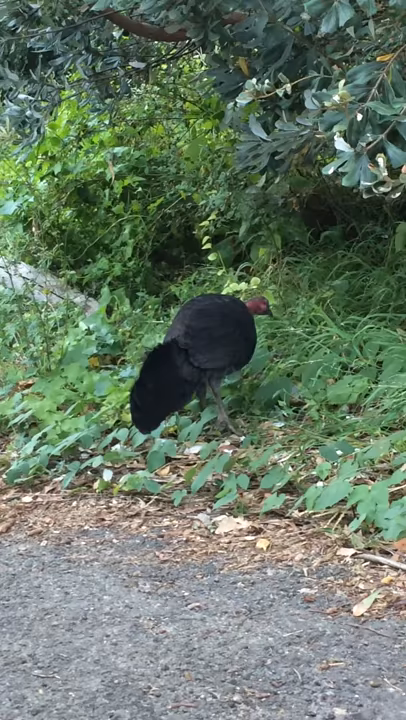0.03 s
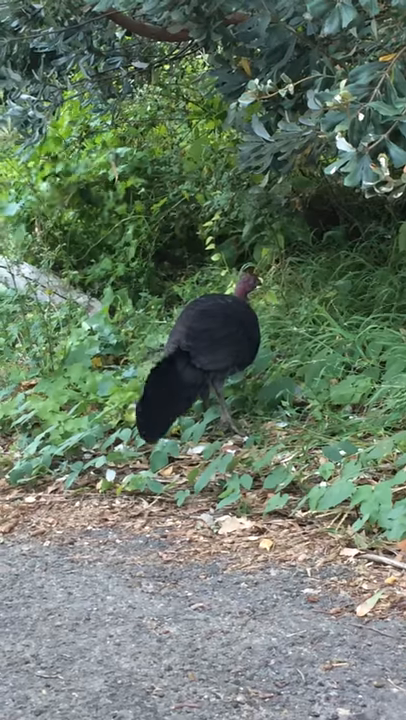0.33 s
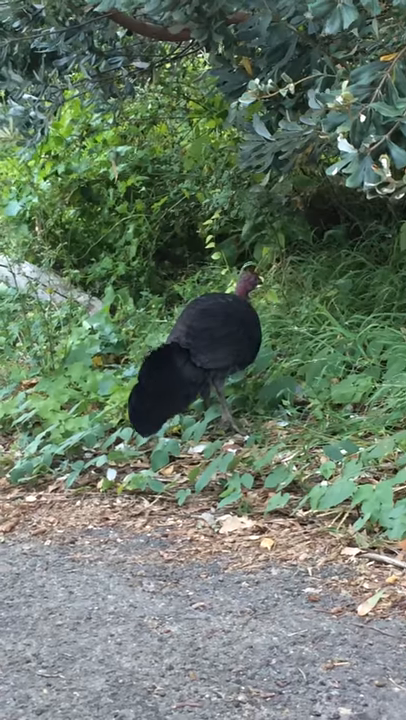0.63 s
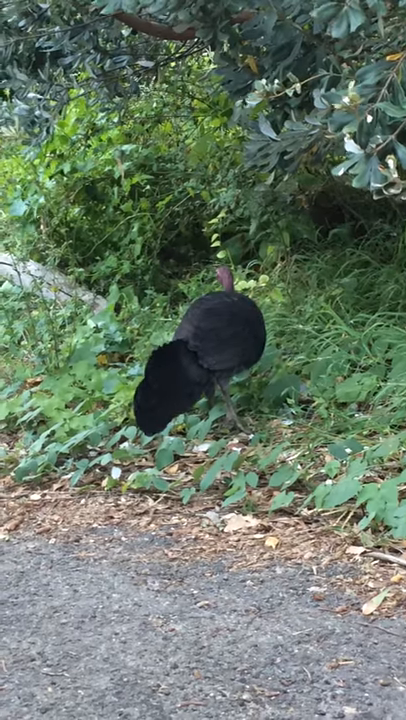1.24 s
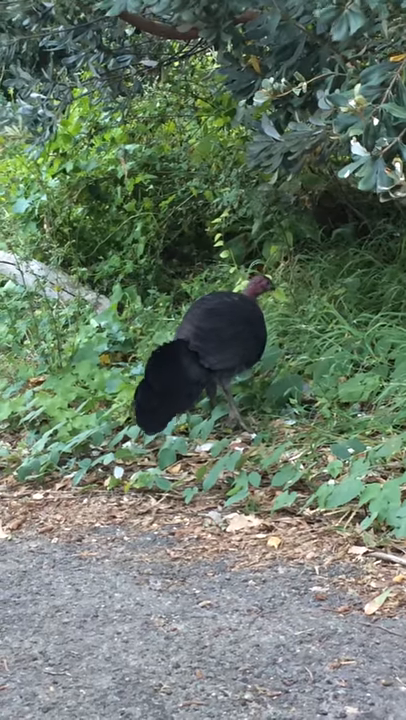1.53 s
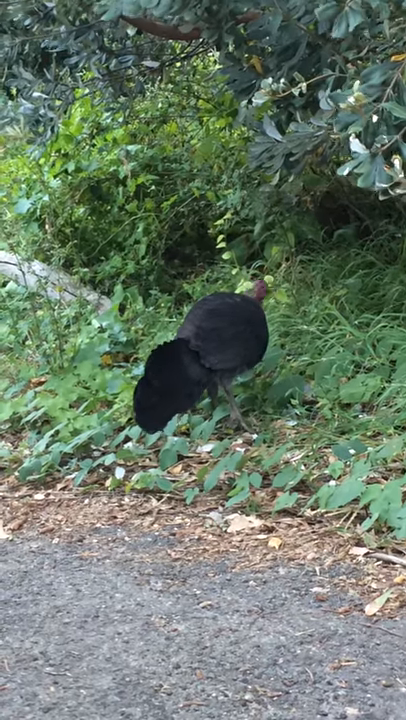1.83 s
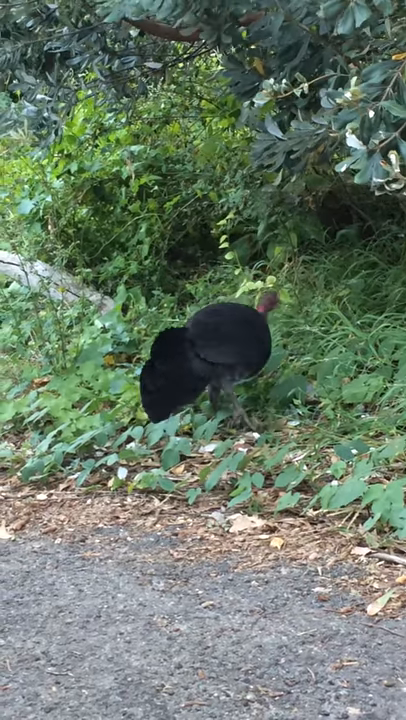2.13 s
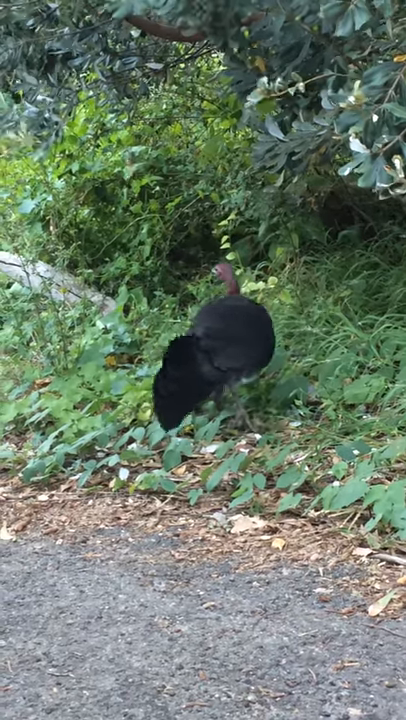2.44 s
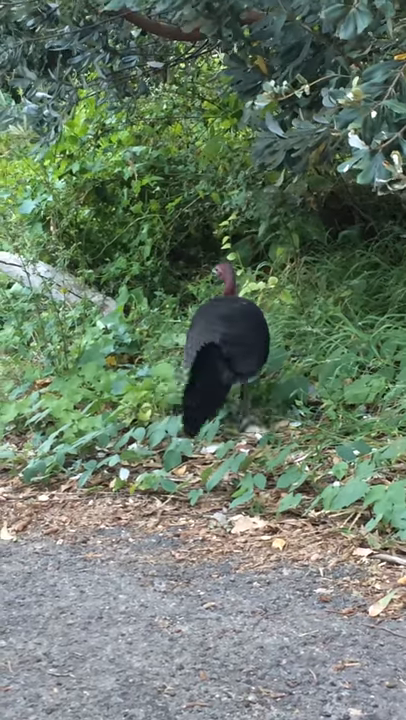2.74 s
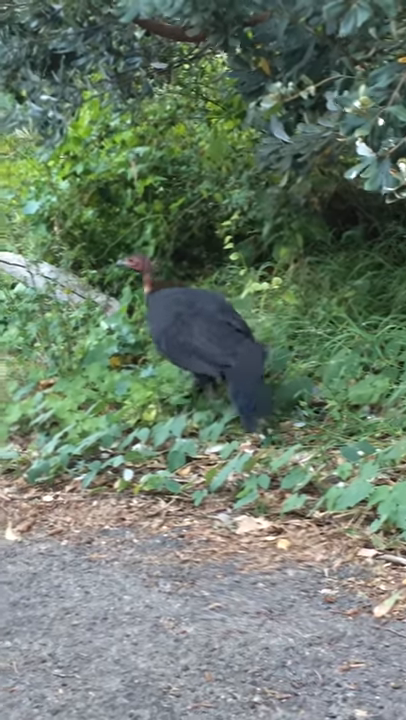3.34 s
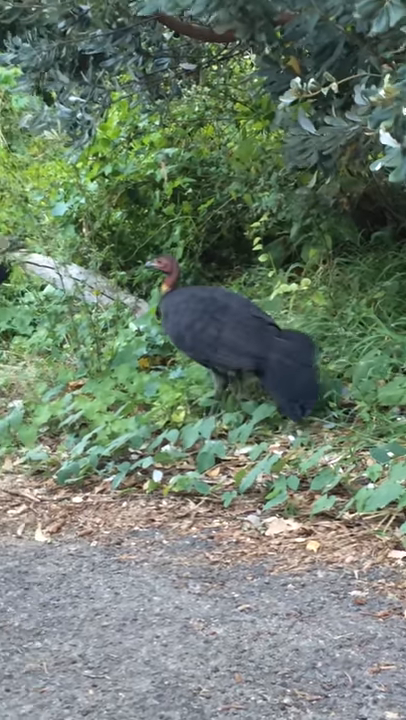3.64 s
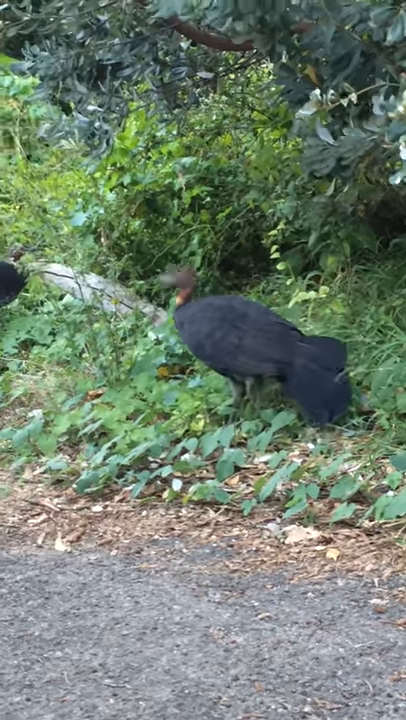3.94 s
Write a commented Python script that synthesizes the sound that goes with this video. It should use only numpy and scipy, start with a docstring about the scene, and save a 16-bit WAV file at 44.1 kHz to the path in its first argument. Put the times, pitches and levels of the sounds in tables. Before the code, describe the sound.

Soft rustles and tiny snaps of a bird stepping through leaves, with a low outdoor rumble.

```python
"""Ground bird in dry leaves

A large bird shifts its feet and turns round in low plants beside a suburban path. Feet and
feathers swish through the leaves; dry stalks snap and set the litter ringing. Behind it lie the
wash and drone of far traffic, a rumble of air with soft buffets on the microphone, and faint hiss."""
import sys
import numpy as np
from scipy import signal
from scipy.fft import rfft, irfft
from scipy.io import wavfile

SR = 44100
rng = np.random.default_rng(int(sys.argv[2]) if len(sys.argv) > 2 else 0)


def int16_out(signal):
    """Quantize to a 16-bit WAV file."""
    q = np.round(np.clip(np.atleast_2d(signal).T, -1, 1) * 32767)
    wavfile.write(sys.argv[1], SR, q.astype(np.int16))


N = 176400
TIME_S = np.arange(N) / SR


def amp(db):
    """Decibels to gain."""
    return 10 ** (np.asarray(db) / 20)


def unit_rms(x):
    """Scales to rms 1."""
    return x / np.sqrt(np.mean(x ** 2) + 1e-20)


def curve(points):
    """Linear interpolation of (time [s], value) rows."""
    return np.interp(TIME_S, *np.transpose(points))


def bin_gains(spectrum, size):
    """Gain per FFT bin from (frequency [Hz], level [dB]) rows."""
    hz, db = np.transpose(spectrum)
    return amp(np.interp(np.log(np.fft.rfftfreq(size, 1 / SR) + 1), np.log(hz), db))


def coloured(x, spectrum):
    """Filters by a spectrum; rms 1."""
    return unit_rms(irfft(rfft(x) * bin_gains(spectrum, N), N))


def drift(rate_hz):
    """Slow random wavering; rms 1."""
    hz = np.fft.rfftfreq(N, 1 / SR)
    return unit_rms(irfft(rfft(rng.standard_normal(N)) * (hz > 0) / (1 + (hz / rate_hz) ** 4), N))


def noise_bed(spectrum, levels, waver_db, waver_hz):
    """Coloured noise wavering about a level curve."""
    return coloured(rng.standard_normal(N), spectrum) * amp(curve(levels) + waver_db * drift(waver_hz))


# stalk fracture (frequency [Hz], relative density [dB])
CRACK_SPECTRUM = [(1200, -26), (2600, -13), (3600, 0), (5000, -5.5), (7000, -1.5), (10000, 0), (12700, 3),
                  (15000, -5)]


def stalk_crack(size, advance_s):
    """A click dispersed by the stalk: high bending waves run ahead of low ones."""
    crossing_s, reference_hz = .0008, 7000
    hz = np.fft.rfftfreq(size, 1 / SR)
    lag_cycles = 2 * crossing_s * np.sqrt(reference_hz * hz) - advance_s * hz
    chirp = irfft(bin_gains(CRACK_SPECTRUM, size) * np.exp(-2j * np.pi * lag_cycles))
    first_half = np.arange(size) < size / 2
    return amp(9.5) * unit_rms(chirp) / np.sqrt(size) * first_half


# breaking stalks and leaves (time [s], level [dB], ring [Hz], relative ring level [dB], ring decay [s])
SNAPS = [(.3455, -48, 9100, 0, .0005), (.5203, -51, 5500, -6, .0004), (.594, -60, 5300, 8, .003),
         (.6523, -53, 11000, -6, .0004), (1.3006, -48.5, 7300, -9, .0004), (2.152, -53, 5000, -6, .0003),
         (2.1926, -40, 11500, 6, 0.00053), (2.196, -56, 6550, 6, .002), (2.2173, -51, 12500, -6, .0003),
         (2.2405, -49, 11000, -6, .0003), (2.399, -53, 7000, -8, .0003), (2.7516, -53, 9000, -3, .0003),
         (2.7716, -47, 5000, 12, 0.00084), (2.775, -47.5, 6000, 10, 0.00064),
         (3.0906, -30.5, 6900, -7, .0003), (3.211, -48, 4500, 0, .0004), (3.3135, -50, 6500, -2, .0005),
         (3.3196, -41.5, 9600, -8, .0002), (3.3223, -47, 10000, -6, .0003), (3.3816, -50, 6000, -3, .0004),
         (3.4596, -61, 8000, -6, .0003), (3.5025, -54, 6000, -4, .0003)]
# dry litter resonances (frequency [Hz], level re snap [dB], t60 [s])
LITTER_MODES = [(3910, -33, .05), (6500, -26, 0.066), (6700, -23, 0.048), (6920, -21.5, .06),
                (7250, -20, .05), (9400, -30, .05), (10030, -31, .04), (13300, -27, .04)]


def snaps():
    """Stalks crack and ring briefly; ground and bushes scatter the sound, and the litter rings on."""
    size, first_arrival_s = 8192, 0.000402
    ground_db, ground_decay_s = -2, 0.0068
    bush_db, bush_decay_s = -14, 0.033
    t, out = np.arange(size) / SR, np.zeros(N)
    crack = stalk_crack(size, advance_s=first_arrival_s)
    for time_s, level_db, ring_hz, ring_db, ring_decay_s in SNAPS:
        ring = amp(ring_db) * np.sin(2 * np.pi * ring_hz * t) * np.exp(-t / ring_decay_s)
        direct = (crack + ring) / np.sqrt(1 + amp(ring_db) ** 2)
        taps = rng.choice([-1, 1], size)
        ground = amp(ground_db) * unit_rms(taps * np.exp(-t / ground_decay_s))
        bushes = amp(bush_db) * unit_rms(taps[::-1] * np.exp(-t / bush_decay_s))
        echoes = signal.fftconvolve(direct, ground + bushes)[:size] / np.sqrt(size)
        litter = sum(amp(db - 60 * t / t60_s) * np.sin(2 * np.pi * (hz * t + rng.random()))
                     for hz, db, t60_s in LITTER_MODES)
        start = round((time_s + first_arrival_s) * SR)
        out[start:start + size] += amp(level_db) * (direct + echoes + litter)[:N - start]
    return out


# strokes through the leaves (start [s], rise [s], fall [s], level [dB])
STROKES = [(.34, .08, .12, -65), (.53, .05, .04, -66), (.64, .015, 0.036, -64), (2.17, .03, 0.066, -56),
           (2.21, .03, 0.065, -60.5), (2.53, 0.021, 0.054, -65), (2.725, 0.03, .06, -60),
           (2.77, .05, 0.12, -63.5), (2.875, .02, .03, -63), (2.96, .025, .1, -66), (3.09, .012, .04, -55),
           (3.10, 0.055, 0.13, -58.5), (3.19, 0.042, 0.11, -53), (3.29, .03, 0.37, -64)]
# sliding leaves (frequency [Hz], relative density [dB])
LEAF_SPECTRUM = [(1200, -25), (2500, -7), (4300, -2.5), (6500, -2.5), (9000, -1.5), (12500, -1.5),
                 (15000, -2.5)]


def rustle():
    """Feet and feathers brush the leaves; each stroke drives a swish and a shower of tiny crackles."""
    crackles_per_s, spread_db, decay_s, bands = 1500, 3.5, 0.00037, 12
    power = sum((amp(db) * np.interp(TIME_S, [s, s + rise_s, s + rise_s + fall_s], [0, 1, 0])) ** 2
                for s, rise_s, fall_s, db in STROKES)
    t, grains = np.arange(128) / SR, np.zeros(N)
    for hz in np.linspace(3000, 14500, bands):
        hits = rng.random(N) < crackles_per_s / bands / SR
        strength = amp(spread_db * np.minimum(rng.exponential(1, N), 4))
        ping = np.sin(2 * np.pi * hz * t) * np.exp(-t / decay_s)
        grains += signal.oaconvolve(hits * strength, ping)[:N]
    crackle = amp(-5) * coloured(grains, LEAF_SPECTRUM)
    swish = amp(-2.5) * coloured(rng.standard_normal(N), LEAF_SPECTRUM)
    return np.sqrt(power) * (crackle + swish)


# one engine (time [s], firing rate [Hz], fundamental rms [dB], octave rms [dB])
DRONE = [(0, 57.74, -71, -66), (.35, 55.96, -55, -68), (.78, 56.66, -53, -67), (1.1, 60.03, -60.5, -54),
         (2.4, 63.84, -68, -74), (2.9, 69, -55, -59.5), (3.3, 67.86, -53, -51.5), (3.52, 67.73, -69, -59.5),
         (3.66, 66.5, -59, -49), (3.78, 66, -56, -53.5), (4, 64.6, -57, -56)]


def engine_drone():
    """A far engine sounds its firing rate and the octave, wavering in pitch and level."""
    firing_hz, fundamental_db, octave_db = (curve(np.array(DRONE)[:, [0, k]]) for k in (1, 2, 3))
    phase = 2 * np.pi * np.cumsum(firing_hz * (1 + 0.019 * drift(7.4))) / SR
    fundamental = amp(fundamental_db + 1.1 * drift(8.4)) * np.sin(phase)
    octave = amp(octave_db + drift(7.6)) * np.sin(2 * phase)
    return np.sqrt(2) * (fundamental + octave)


def machine_hum():
    """One faint, unsteady tone from a far machine."""
    rms_db = -73 + 2.3 * drift(7.8)
    hz = 383.7 * (1 + 0.0099 * drift(11.9))
    return np.sqrt(2) * amp(rms_db) * np.sin(2 * np.pi * np.cumsum(hz) / SR)


# tyre wash (frequency [Hz], relative density [dB])
TYRE_SPECTRUM = [(100, -9), (300, -4), (345, -8), (430, -4), (560, -5), (740, -2), (930, 0), (1100, -1),
                 (1350, -4.5), (1900, -9), (2500, -15), (3200, -23), (5000, -32), (9000, -45), (15000, -33)]
# tyre wash (time [s], level [dB])
TYRE_LEVELS = [(0, -53), (1.2, -53), (2.4, -52.5), (3.3, -52), (4, -52)]
# engine roar (frequency [Hz], relative density [dB])
ROAR_SPECTRUM = [(60, -15), (100, -2), (128, 0), (165, -1), (215, -3.5), (260, -9), (330, -24),
                 (600, -48.5)]
# engine roar (time [s], level [dB])
ROAR_LEVELS = [(0, -51.5), (.7, -51.5), (1.3, -52.5), (2.45, -52), (3.1, -50), (3.5, -50.5), (3.95, -49)]


def traffic():
    """Far tyres and engines blend into a wash over a low roar."""
    tyres = noise_bed(TYRE_SPECTRUM, TYRE_LEVELS, waver_db=0.58, waver_hz=13)
    engines = noise_bed(ROAR_SPECTRUM, ROAR_LEVELS, waver_db=1.0, waver_hz=11.4)
    return tyres + engines


# air rumble (frequency [Hz], relative density [dB])
RUMBLE_SPECTRUM = [(15, -32), (29, -17), (38, -9), (50, 2.5), (68, 4.5), (92, -1), (120, -14), (200, -36.5)]
# air rumble (time [s], level [dB])
RUMBLE_LEVELS = [(0, -52), (.5, -53), (.95, -54.5), (1.4, -54), (1.56, -54.5), (1.76, -55.5), (2.14, -55.5),
                 (2.35, -56.5), (2.65, -53.5), (3.4, -54.5), (4, -55.5)]
# pressure pulses (centre time [s], level [dB], frequency [Hz], half length [s])
BUFFETS = [(.333, -43, 81, 0.0087), (0.494, -42.5, 80.6, 0.021), (0.747, -43, 58, 0.023),
           (1.014, -46.5, 65, 0.015), (1.56, -41, 60, 0.019), (1.603, -33.5, 66.3, 0.01),
           (1.852, -44, 74, .025), (2.157, -41.5, 65, .016), (2.497, -49.5, 65, 0.013)]


def air():
    """Moving air rumbles; buffets suck and then push on the microphone."""
    out = noise_bed(RUMBLE_SPECTRUM, RUMBLE_LEVELS, waver_db=1.12, waver_hz=14.6)
    for centre_s, db, hz, half_s in BUFFETS:
        t = TIME_S - centre_s
        envelope = amp(db) / (1 + (t / half_s) ** 2) ** 2
        out += np.sqrt(2) * envelope * np.sin(2 * np.pi * hz * t)
    return out


def scene():
    """The bird over the suburban background, mono."""
    bird = snaps() + rustle()
    return (bird + engine_drone() + machine_hum() + traffic() + air())[None]


# microphone hiss (frequency [Hz], relative density [dB])
HISS_SPECTRUM = [(1000, 0), (4000, 0), (8000, -15.5), (11000, -7), (13500, 0), (15200, 5.5)]
# microphone hiss (time [s], level [dB])
HISS_LEVELS = [(0, -64.5), (1.3, -63.5), (2, -65), (3, -66), (4, -63)]


def record(dry):
    """Adds microphone hiss, switches on after a moment and limits the band."""
    switch_on_s, cutoff_hz = .0355, 15400
    hiss = noise_bed(HISS_SPECTRUM, HISS_LEVELS, waver_db=0.5, waver_hz=18)
    live = (dry + hiss) * (TIME_S > switch_on_s)
    lowpass = signal.firwin(511, cutoff_hz, window=("kaiser", 9), fs=SR)
    return signal.oaconvolve(live, lowpass[None], "same")


dry = scene()
out = record(dry)
int16_out(out)
```